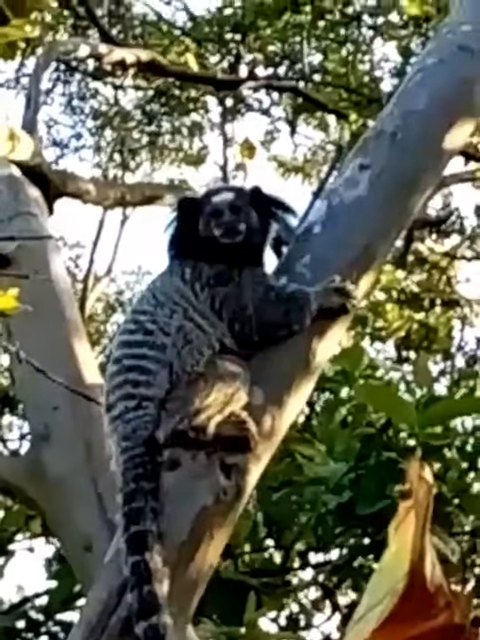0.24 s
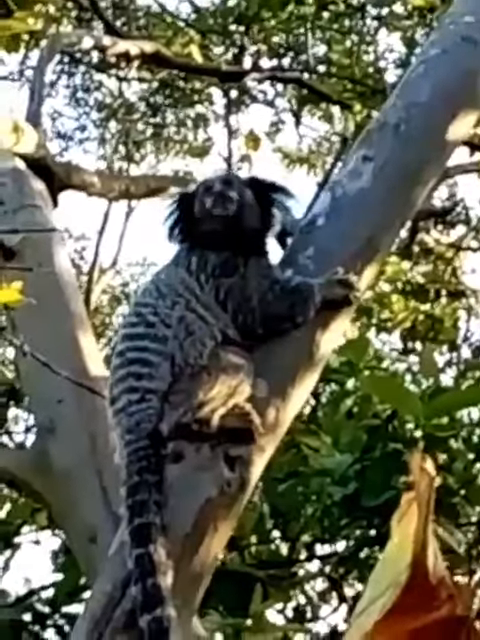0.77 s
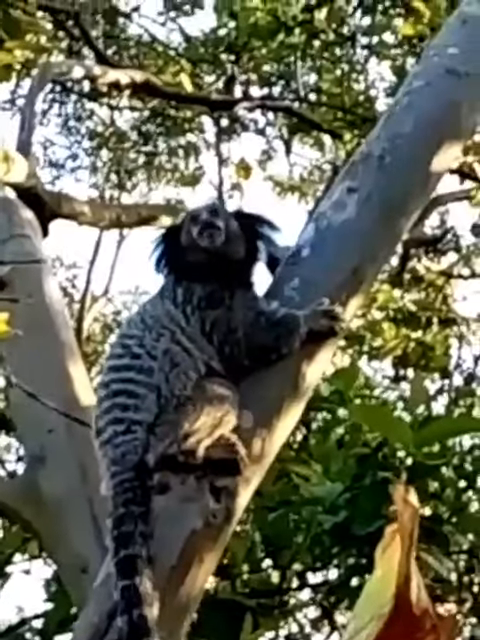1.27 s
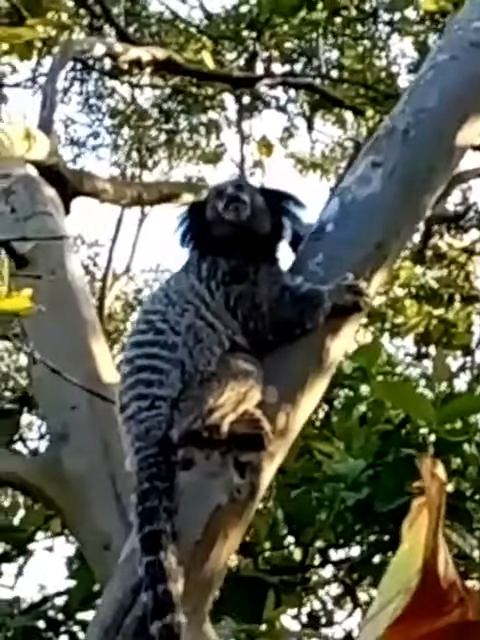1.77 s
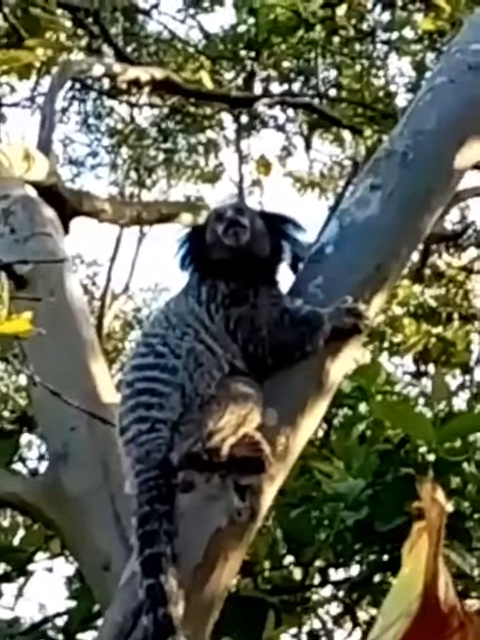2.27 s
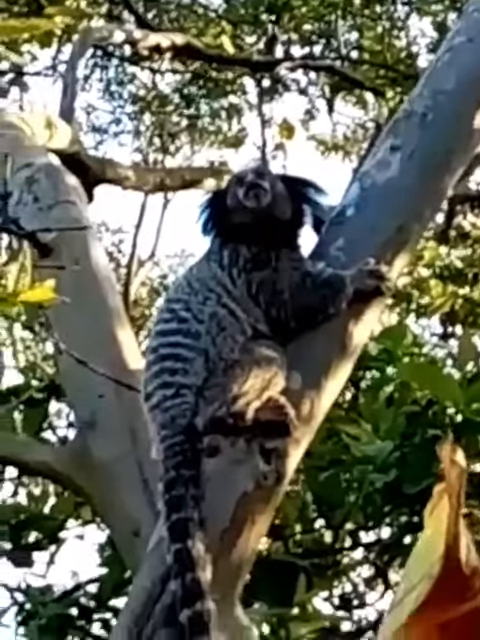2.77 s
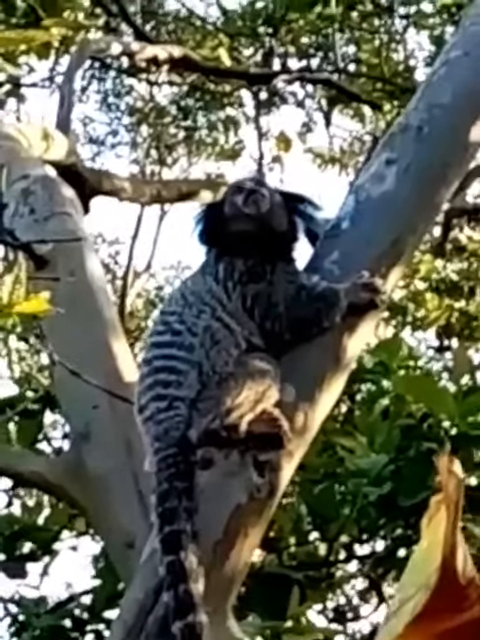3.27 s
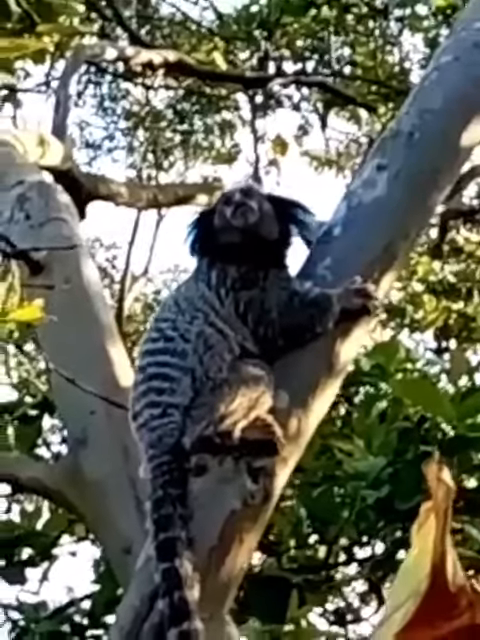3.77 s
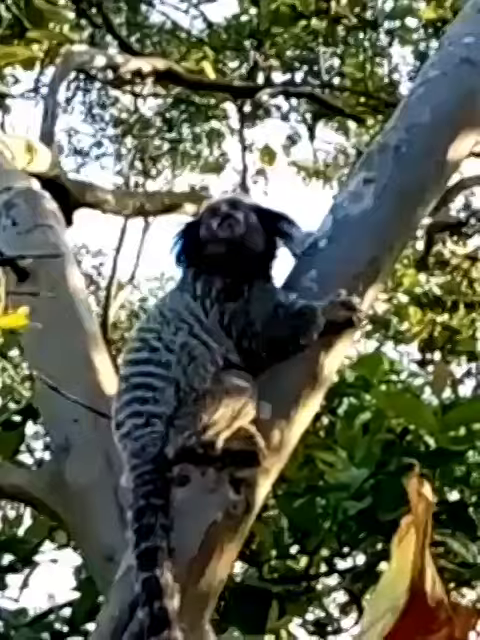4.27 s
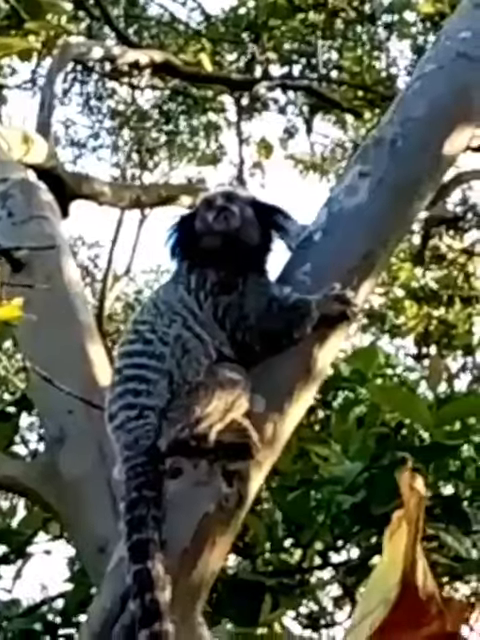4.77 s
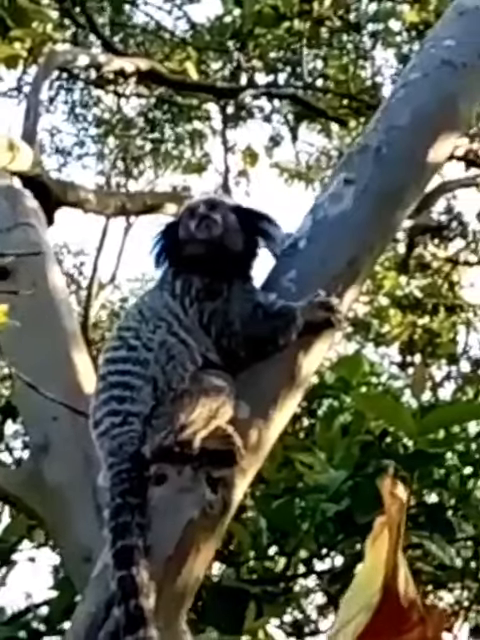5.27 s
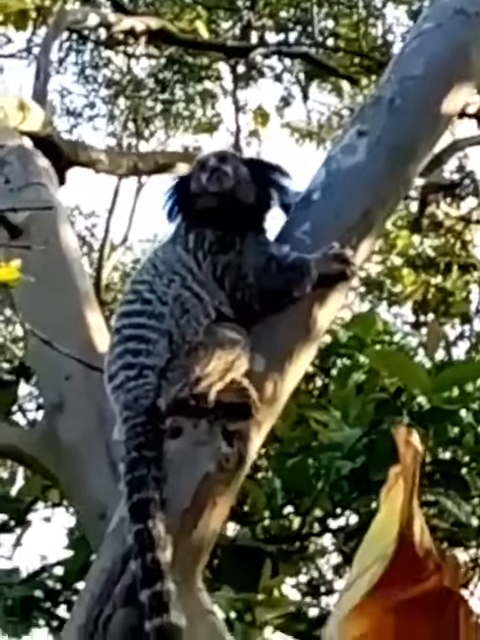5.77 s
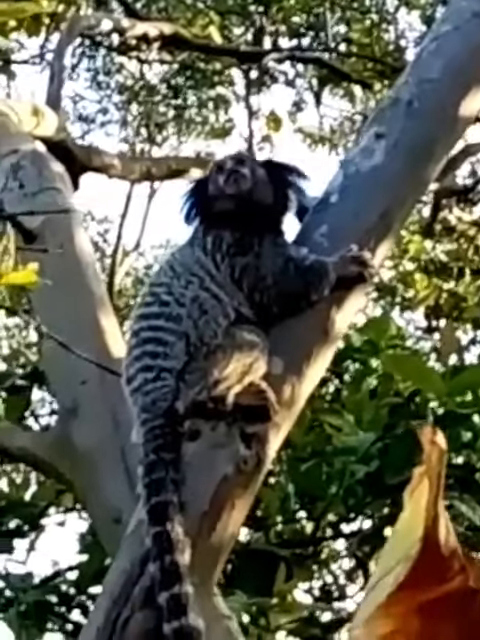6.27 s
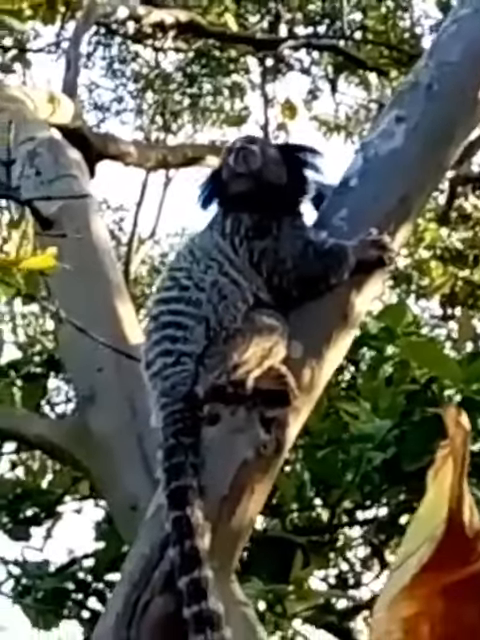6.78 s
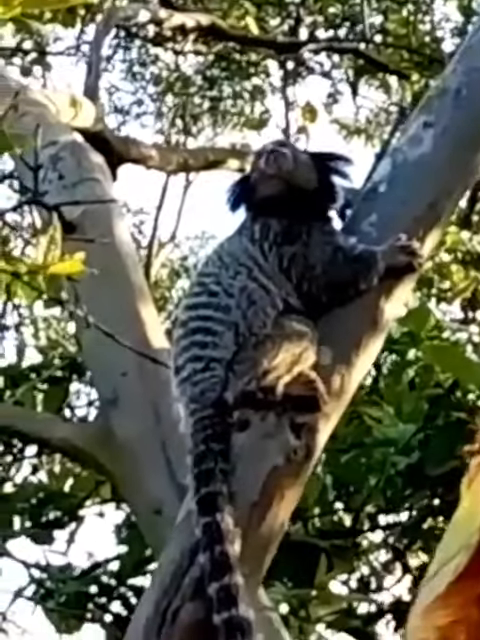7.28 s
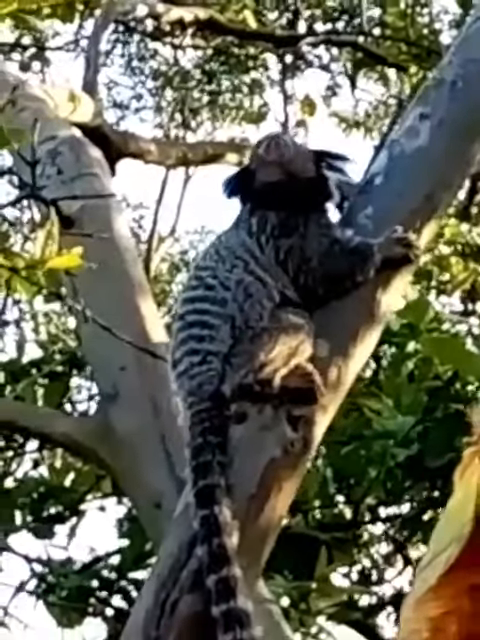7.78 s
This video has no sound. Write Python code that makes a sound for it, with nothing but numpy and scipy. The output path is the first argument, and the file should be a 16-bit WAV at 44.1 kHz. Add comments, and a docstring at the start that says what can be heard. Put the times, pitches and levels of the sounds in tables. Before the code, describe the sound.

Close to a phone microphone among trees, a marmoset gives a long, regular series of short, harsh chirps, each starting with a spit of air and sliding down. Early on, a second animal further off adds thin gliding whistles. Faint bird peeps, sparse dry ticks and late insect chips come between, over quiet low wind and traffic wash and leaf rustle with a slight woodland echo.

```python
"""Among trees, a marmoset scolds close to a phone with a series of harsh falling chirps: overtones of a gliding
pitch and breath noise, coloured by chest, mouth and teeth. A second one whistles further off in nearly pure tones.
Short distant notes are sliding sines: birds near 3 kHz, a whistle near 5.4 kHz, insect chips near 6.6 kHz and a
blip near 1.3 kHz. A few dry ticks sound, most with a twig ringing. A low wash of wind and traffic and a rustle of
leaves and insects, both shaped noise, lie underneath. Trunks and leaves echo: convolution with decaying noise."""
import sys
import numpy as np
from scipy import signal
from scipy.fft import rfft, irfft, next_fast_len
from scipy.io import wavfile
from scipy.ndimage import uniform_filter1d, minimum_filter1d, map_coordinates

SR = 44100
rng = np.random.default_rng(int(sys.argv[2]) if len(sys.argv) > 2 else 0)


def to_wav(s):
    """Save 16-bit WAV."""
    ch = np.atleast_2d(s).T  # columns
    pcm = np.round(np.clip(ch, -1, 1) * 32767)  # PCM
    wavfile.write(sys.argv[1], SR, pcm.astype(np.int16))


N = 354563

# Far rumble of wind and traffic over time: t/s, level/dB
RUMBLE_LEVEL = [(0, -48.5), (.22, -52), (.69, -44.5), (1.27, -55.5), (1.5, -46.5), (1.75, -53),
                (2.4, -45.5), (2.69, -56), (3.3, -56), (5.1, -56), (5.73, -52.5), (5.91, -58.5),
                (6.14, -48), (6.3, -54.5), (7, -57), (7.86, -62), (8.04, -51.5)]
# Spectrum of the rumble, relative density: f/Hz, level/dB
RUMBLE_COLOUR = [(25, -36), (50, -13.5), (80, -11), (125, -3), (190, -2.5), (300, -8.5), (420, -6),
                 (560, -9.5), (700, -14.5), (738, -8), (775, -21), (950, -28), (1300, -59)]
# Rustle of leaves and insects over time: t/s, level/dB (its mean course)
RUSTLE_LEVEL = [(0, -59), (.3, -62), (1.5, -64), (1.85, -59), (2.33, -69), (2.7, -58), (3.4, -54),
                (3.75, -63), (4.9, -58), (5.9, -64), (6.2, -56), (6.8, -65), (8.05, -62)]
# Spectrum of the rustle, relative density: f/Hz, level/dB
RUSTLE_COLOUR = [(700, -26.5), (1000, -12), (1700, -10), (2100, -11.5), (3000, -5), (4000, -12),
                 (4900, -11.5), (6400, -3), (7200, -27.5), (8000, -32), (13500, -35), (15000, -19),
                 (15700, -61.5)]
# Decay of the echo among trunks and leaves: f/Hz, t60/s
ECHO_DECAY = [(1000, 0.34), (4000, 0.36), (6500, 0.35), (9000, .2), (12000, 0.21), (15000, 0.31)]
# Frequency response of the echo: f/Hz, level/dB
ECHO_COLOUR_CURVE = [(1000, -2), (2500, -2), (7000, 0), (12000, -1), (15000, -10)]
# Short distant notes: birds near 3 kHz, a whistle near 5.4 kHz, insect chips near 6.6 kHz, a blip near 1.3 kHz:
# t/s, length/s, first f/Hz, last f/Hz, nominal peak level/dB
DISTANT_NOTES = [(0.324, 0.037, 3030, 3060, -56), (1.03, 0.052, 3090, 3030, -61),
                 (1.092, 0.13, 3540, 3420, -63), (1.204, 0.035, 3110, 3000, -53.5),
                 (1.525, 0.025, 3100, 3000, -54), (1.624, 0.037, 3400, 3280, -56),
                 (1.89, 0.088, 3320, 3230, -56), (1.957, 0.056, 3070, 2950, -57),
                 (2.419, 0.056, 3440, 3390, -60), (2.782, 0.053, 5410, 5500, -46),
                 (3.453, 0.041, 3310, 3210, -50.5), (3.725, 0.058, 3360, 3220, -47.5),
                 (3.733, 0.011, 1280, 1280, -46), (4.244, 0.05, 3125, 3160, -50.5),
                 (4.497, 0.1, 3130, 2950, -52.5), (5.27, 0.079, 3370, 3090, -54),
                 (5.826, 0.06, 3310, 3140, -53.5), (6.155, 0.036, 3330, 3260, -46),
                 (7.195, .015, 6560, 6360, -65), (7.256, 0.013, 6500, 6450, -44),
                 (7.321, 0.015, 6610, 6500, -45), (7.52, 0.015, 6600, 6400, -47),
                 (7.59, 0.02, 6750, 6270, -46.5), (7.664, 0.032, 6600, 6510, -47),
                 (7.762, 0.018, 6620, 6460, -43)]
# Dry ticks: t/s, peak level/dB, spectral tilt/(dB per octave), share of twig ring/(0-1)
DRY_TICKS = [(2.818, -40, 3, 1), (3.103, -39, 3, 0.83), (5.087, -45, 7, .9), (5.196, -12, -4, 0),
             (6.925, -38, 1, 1), (7.659, -40, -2, 0.8)]
# Modes of a ringing twig: f/Hz, relative level/dB, t60/s
TWIG_MODES = [(2490, -1, 0.018), (5500, 2, 0.011)]
# Whistles of the second animal, one glide each: t/s, pitch f/Hz, level/dB before a common trim
WHISTLE_GLIDES = [
    [(1.165, 5750, -40), (1.2, 5850, -30.5), (1.235, 5697, -23), (1.31, 5860, -40)],
    [(1.46, 5900, -58), (1.49, 6022, -19), (1.56, 6060, -22), (1.612, 6110, -36), (1.64, 6175, -21.5),
     (1.73, 6125, -39), (1.78, 5320, -36.5)],
    [(1.895, 5500, -28.5), (1.99, 5820, -22), (2.077, 5920, -20.5), (2.165, 5990, -23.5), (2.32, 6090, -18),
     (2.365, 6130, -29.5), (2.4, 6260, -19.5), (2.475, 6410, -14.5), (2.52, 6660, -53)],
]
# Scolding chirps, each a pair of settings and glide.
# Settings: hiss level/dB, swell of the hiss/dB, swell peak/(share of length), mouth level/dB, chest level/dB,
# chest change by the end/dB, spit of air at the start/dB, its decay constant/s, fade/(share of length),
# mouth peak/(share of length), period doubling/(0-1). Glide: t/s, pitch f/Hz, roughness/(0-1)
SCOLDING = [ ((-27, 1.5, .5, -21.5, -32.5, -9.5, 8, .015, .25, .45, .1), [(-.07, 2400, .2), (0, 2278, .2),
            (.052, 1692, .3), (.072, 1150, .32), (.09, 1073, .35)]),
            ((-25.5, 3.5, 0.2, -23.5, -38.5, 6, 7, .025, .15, .5, .15), [(.401, 1739, .5), (.487, 1980, .4),
            (.495, 2555, .2), (.553, 1198, .27), (.565, 1054, .28), (.579, 1100, .3)]),
            ((-24.5, 1, 1, -24.5, -36, 5, 9, .025, .15, .3, .1), [(.851, 1746, .2), (.875, 1936, .2),
            (.896, 2410, .23), (.961, 1688, .27), (.988, 1050, .3), (1.005, 903, .3)]),
            ((-24, 1, 0.3, -24, -32.5, 1.5, 10, .01, .12, .2, .1), [(1.262, 2294, .15), (1.281, 2652, .17),
            (1.3, 2255, .2), (1.371, 1430, .29), (1.388, 1139, .31), (1.416, 1085, .35)]),
            ((-24, 4.5, 0.7, -23, -34.5, 1, 8, .035, .18, .35, .1), [(1.68, 1999, .5), (1.7, 2537, .4),
            (1.722, 2656, .3), (1.752, 1988, .31), (1.784, 1720, .32), (1.825, 1147, .34),
            (1.844, 950, .35)]), ((-26, 3, 0.7, -23.5, -34.5, 1.5, 9, .012, .18, .3, .1),
            [(2.098, 2469, .4), (2.128, 2692, .38), (2.14, 2280, .37), (2.181, 1941, .35),
            (2.221, 978, .32), (2.245, 965, .3)]),
            ((-24, 4.5, .75, -19.5, -33, -4.5, 9, .018, .12, .35, .1), [(2.487, 2162, .15),
            (2.505, 2853, .17), (2.536, 2288, .23), (2.59, 1969, .32), (2.604, 1695, .34),
            (2.615, 1153, .36), (2.64, 1137, .4)]), ((-25.5, -0.5, 0, -25, -35, 5, 14, .009, .08, .3, .1),
            [(2.837, 2492, .25), (2.853, 2710, .25), (2.888, 2127, .27), (2.928, 1194, .29),
            (2.954, 946, .3)]), ((-23.5, 1.5, -0.5, -23, -34.5, -5.5, 9, .02, .1, .4, .5),
            [(3.165, 2330, .1), (3.176, 3050, .12), (3.191, 2800, .15), (3.2, 2550, .72), (3.22, 2150, .65),
            (3.24, 1800, .58), (3.262, 1358, .48), (3.299, 1297, .7)]),
            ((-23, 5.5, 0.9, -26, -36, -13.5, 8, .022, .14, .35, .5), [(3.519, 2117, .15),
            (3.545, 2667, .2), (3.565, 2230, .6), (3.628, 2300, .75), (3.636, 1250, .55), (3.65, 1100, .45),
            (3.678, 1043, .6)]), ((-24, 9, 0.9, -23, -37, -12.5, 9, .025, .16, .35, .2),
            [(3.912, 2333, .15), (3.933, 2922, .16), (3.962, 2242, .17), (4.015, 2480, .2),
            (4.022, 1250, .5), (4.045, 1150, .55), (4.061, 1100, .85)]),
            ((-23, 6.5, 0.8, -23, -38.5, -4, 10, .012, .28, .4, .5), [(4.291, 2541, .3), (4.314, 3000, .58),
            (4.366, 1603, .43), (4.385, 1456, .2), (4.407, 1283, .23), (4.469, 1300, .3)]),
            ((-25, 4.5, -0.9, -24, -40.5, 12.5, 11, .03, .16, .55, .3), [(4.722, 2940, .85),
            (4.762, 2753, .7), (4.794, 1657, .3), (4.81, 1426, .2), (4.849, 1592, .2), (4.875, 1412, .2),
            (4.91, 633, .2)]), ((-25.5, 4.5, 0.5, -23.5, -31, -2, 10, .014, .1, .2, .1),
            [(5.114, 1700, .12), (5.146, 1862, .14), (5.165, 1629, .16), (5.231, 1263, .2),
            (5.241, 1265, .27), (5.249, 631, .6), (5.266, 596, .75)]),
            ((-28, 6, .35, -24.5, -30.5, -10, 8, .008, .14, .25, .4), [(5.513, 3600, .2), (5.52, 2700, .25),
            (5.531, 2152, .5), (5.546, 2291, .68), (5.553, 1365, .6), (5.58, 1280, .35), (5.601, 1195, .43),
            (5.629, 854, .55)]), ((-24, 9.5, 0.7, -24.5, -39, -11.5, 5, .018, .14, .5, .9),
            [(5.908, 2620, .83), (5.935, 2600, .7), (5.95, 2300, .35), (5.968, 2250, .35), (5.99, 1900, .4),
            (6.017, 1333, .53), (6.045, 1182, .6)]), ((-24, 2, .4, -21, -32, -6.5, 5, .025, .22, .4, .15),
            [(6.278, 1810, .8), (6.297, 2050, .65), (6.31, 2070, .2), (6.339, 2026, .22),
            (6.357, 1820, .25), (6.39, 1656, .27), (6.41, 1526, .29), (6.436, 1184, .5),
            (6.459, 1065, .8)]), ((-26, 5, 0.1, -27, -27, -9.5, 8, .008, .16, .12, .1), [(6.624, 1695, .12),
            (6.634, 1858, .12), (6.668, 1508, .13), (6.718, 1424, .15), (6.738, 1085, .2), (6.75, 685, .4),
            (6.772, 629, .6)]), ((-24.5, 5, 1.5, -22.5, -30, -4, 8, .012, .25, .35, .15),
            [(6.998, 1738, .92), (7.03, 1850, .88), (7.048, 1860, .15), (7.078, 1548, .17),
            (7.118, 1407, .23), (7.146, 1113, .28), (7.16, 1056, .3)]),
            ((-29, 3.5, -0.7, -26.5, -32.5, -5.5, 8, .009, .2, .25, .15), [(7.385, 1840, .9),
            (7.405, 2046, .8), (7.43, 1595, .2), (7.447, 1289, .24), (7.468, 1230, .3), (7.493, 675, .36),
            (7.503, 661, .38)]), ((-22.5, 3.5, -0.5, -22.5, -42, -6, 9, .03, .22, .4, .4),
            [(7.818, 2508, .85), (7.851, 3022, .5), (7.9, 2100, .5), (7.931, 1690, .55), (7.966, 1323, .77),
            (7.976, 1340, .83)]), ]
# Spectra of the three regions of the voice, relative density: f/Hz, level/dB
CHEST_COLOUR = [(350, -51.5), (550, 19.5), (750, 5), (1100, 4), (1600, 1), (2400, 5.5), (3300, -2),
                (4400, -2), (5200, -52)]
MOUTH_COLOUR = [(3800, -24), (4600, -18), (5900, -0.5), (6350, -8), (6750, 1), (7400, -3.5), (8000, -12.5),
                (9000, -23.5), (10000, -25)]
TEETH_COLOUR = [(8000, -54.5), (9200, -27.5), (11600, -18), (12100, -30), (12600, -16), (13600, -13),
                (14800, 5.5), (15600, -10.5), (15900, -39.5), (16600, -49)]

TOP_HZ = 16700  # band limit of the phone
LEAVES_STIR_DB = 2  # scale of the random stirring
SWELL_WIDTH = .16  # share of length
POP_DB, POP_S = 4, .003  # click of the parting lips, decay constant
MOUTH_SHUT_DB, MOUTH_SAG_DB = -6, -11  # level at the start, change after the peak
CHEST_OPENS, CHEST_SHUT_DB = 0.38, -22.5  # the chest joins in late: share of length, level at the start
FADE_DB = -16  # change over the fade


def amp(db):
    """Level definition: amplitude ratio from decibels."""
    return 10 ** (np.asarray(db) / 20)


def unit(x):
    """Normalisation to an rms value of 1."""
    return x / np.sqrt(np.mean(x ** 2) + 1e-20)


def along(points, hz):
    """Interpolation of (f/Hz, value) points on a logarithmic frequency axis."""
    f, v = np.transpose(points)
    return np.interp(np.log(hz + 1), np.log(f + 1), v)


def curves(rows):
    """Linear interpolation in time: the samples a table spans, then a curve for each column."""
    s, *cols = np.transpose(rows)
    n = np.arange(max(round(s[0] * SR), 0), min(round(s[-1] * SR), N))
    return n, [np.interp(n / SR, s, c) for c in cols]


def wobble(rate, size=N):
    """Band-limited random modulation: a smooth curve through rate random knots a second."""
    knots = rng.standard_normal(int(size * rate / SR) + 4)
    return map_coordinates(knots, [np.arange(size) * rate / SR])


def filtered(x, response):
    """Linear filtering: the spectrum of x times a response of frequency."""
    m = next_fast_len(x.shape[-1] + 8192)
    spectrum = rfft(x, m) * response(np.fft.rfftfreq(m, 1 / SR))
    return irfft(spectrum, m)[..., :x.shape[-1]]


def coloured(x, spectrum):
    """Spectral shaping that keeps the power of a flat input."""
    points = [(1, -120)] + spectrum + [(SR / 2, -120)]
    return filtered(x, lambda hz: unit(amp(along(points, hz))))


def fade(count, attack, release):
    """Linear envelope: soft edges of the given durations in seconds."""
    t = np.arange(count) / SR
    return np.clip(np.minimum(t / attack, t[::-1] / release), 0, 1)


def rush(spectrum, patchy_db):
    """Random noise of rms 1 whose gain varies in patches of time and frequency."""
    z = signal.stft(rng.standard_normal(N), nperseg=512)[2]
    field = rng.standard_normal(z.shape)
    field = uniform_filter1d(uniform_filter1d(field, 4, 0), 10, 1)
    patchy = signal.istft(z * amp(patchy_db * unit(field)), nperseg=512)[1][:N]
    return unit(coloured(patchy, spectrum))


def wash():
    """Broadband ambient noise: a far rumble, and the rustle of leaves and insects."""
    t = np.arange(N) / SR
    rumble_db = np.interp(t, *np.transpose(RUMBLE_LEVEL))
    rumble = amp(rumble_db) * rush(RUMBLE_COLOUR, patchy_db=2.6)
    rustle_db = np.interp(t, *np.transpose(RUSTLE_LEVEL)) + LEAVES_STIR_DB * wobble(4.5)
    return rumble + amp(rustle_db) * rush(RUSTLE_COLOUR, patchy_db=2.8)


def echo(x, decays):
    """Diffuse reverberation: each frequency dies at its own speed; the leaves swallow some of the top."""
    hz, t, z = signal.stft(rng.standard_normal(SR // 2), SR, nperseg=256)
    decay = amp(-60 * t / along(decays, hz)[:, None])
    tail = signal.istft(z * decay, SR, nperseg=256)[1]
    wet = signal.fftconvolve(x, tail / np.linalg.norm(tail))[:N]
    return filtered(wet, lambda f: amp(along(ECHO_COLOUR_CURVE, f)))


def distant_notes():
    """Frequency glides: short sines that flutter a little in level on the way through the leaves."""
    out = np.zeros(N)
    for s, length, first_hz, last_hz, db in DISTANT_NOTES:
        count = round(length * SR)
        phase = 2 * np.pi * np.cumsum(np.linspace(first_hz, last_hz, count)) / SR
        flutter_db = 2.0 * wobble(90, size=count)
        shape = fade(count, length * 0.1, length * 0.28) * amp(db + flutter_db)
        out[round(s * SR):][:count] += shape * np.sin(phase)
    return out


def ticks():
    """Impulse excitation: single clicks, most of which set the damped modes of a twig ringing."""
    out, t = np.zeros(N), np.arange(512) / SR
    twig = sum(amp(level_db - 60 * t / t60) * np.sin(2 * np.pi * hz * t) for hz, level_db, t60 in TWIG_MODES)
    for s, db, tilt_db, ring in DRY_TICKS:
        snap = (1 + .5 * rng.standard_normal(len(t))) * amp(-60 * t / .0004)  # t60 0.4 ms
        click = np.pad((1 - ring) * snap + ring * twig / 2, (256, 0))

        def tilted_band(hz):
            """Spectral tilt between a lower edge of 250 Hz and an upper one near 6200 Hz."""
            return amp(tilt_db * np.log2(hz / 1500 + .1)) * (hz > 250) / (1 + (hz / 6200) ** 16)

        click = filtered(click, tilted_band)
        out[round(s * SR) - 256:][:len(click)] += amp(db) * click / np.abs(click).max()
    return out


def whistles():
    """Near-sinusoidal oscillation: a gliding tone with a faint octave."""
    out = np.zeros(N)
    for rows in WHISTLE_GLIDES:
        n, (hz, db) = curves(rows)
        drift = 0.0009 * wobble(60, size=len(n))
        phase = 2 * np.pi * np.cumsum(hz * (1 + drift)) / SR
        tone = np.sin(phase) + amp(-48.5) * np.sin(2 * phase)
        level = amp(db - 1.5 + 1.2 * wobble(33, size=len(n)))
        out[n] += level * tone * fade(len(n), .005, .01)
    return out


def region_levels(t, length, hiss_db, swell_db, swell_at, mouth_db, chest_db, sag_db, spit_db, spit_s, fades,
                  mouth_at):
    """Articulation in dB: air spits through the teeth first, mouth and chest open after, all die together."""
    u = t / length

    def opened(at, shut_db, change_db):
        """Piecewise-linear level: it moves from shut_db to 0 at its opening, then to change_db."""
        return np.where(u < at, shut_db * (1 - u / at), change_db * (u - at) / (1 - at))

    pop_db = POP_DB * np.exp(-t / POP_S)
    edge_db = pop_db + FADE_DB * np.clip(1 - (1 - u) / fades, 0, 1)
    swell = swell_db * np.exp(-((u - swell_at) / SWELL_WIDTH) ** 2)
    teeth_db = hiss_db + spit_db * np.exp(-t / spit_s) + swell
    return [chest_db + opened(CHEST_OPENS, CHEST_SHUT_DB, sag_db) + edge_db,
            mouth_db + opened(mouth_at, MOUTH_SHUT_DB, MOUTH_SAG_DB) + edge_db,
            teeth_db + edge_db]


def chirps():
    """Source-filter voice: roughness shakes a gliding harmonic tone and lets breath through, most in the treble."""
    out, k = np.zeros(N), np.arange(1, 30)[:, None]
    strength = amp(6.0 * (k == 1))  # the fundamental stands out
    for (*levels, doubling), glide in SCOLDING:
        n, (hz, rough) = curves(glide)
        size, start_s = len(n), glide[0][0]
        chest_db, mouth_db, teeth_db = region_levels(n / SR - start_s, glide[-1][0] - start_s, *levels)
        drift = (.005 + .03 * rough) * wobble(110, size=size)
        jitter = (.005 + .1 * rough ** 2) * wobble(900, size=size)
        phase = 2 * np.pi * np.cumsum(hz * (1 + drift + jitter)) / SR

        # each overtone wavers alone
        flutter = amp((1.5 + 4 * rough) * np.array([wobble(70, size=size) for _ in k]))
        start_phase = rng.uniform(0, 2 * np.pi, k.shape)
        overtones = strength * flutter * np.cos(k * phase + start_phase) * (k * hz < SR / 2.5)
        # overtones as dense in power as white noise of rms 1
        tone = np.sum(overtones, 0) * np.sqrt(4 * hz / SR)
        tone *= amp((.5 + 3 * rough) * wobble(350, size=size))

        # strong and weak cycles alternate: spectral lines halfway between the overtones
        halves = 2 * doubling * rough * np.cos(phase / 2)
        breath = rng.standard_normal(size) * (1 + 0.22 * np.cos(phase))  # pulses with the pitch
        breath = filtered(breath, lambda f: 1 / (1 + (850 / (f + 1)) ** 6))

        # a smaller power lets more breath through; split scales the period doubling
        regions = [(CHEST_COLOUR, chest_db, 1.8, .2), (MOUTH_COLOUR, mouth_db, 1.4, 1),
                   (TEETH_COLOUR, teeth_db, .5, 1)]
        for colour, db, power, split in regions:
            share = rough ** power
            mixture = np.sqrt(1 - share) * tone * (1 + split * halves) + np.sqrt(share) * breath
            level = amp(db + 0.79 * wobble(122, size=size))
            out[n] += coloured(mixture, colour) * level * fade(size, .0015, .008)
    return out


def scene():
    """Superposition: direct sounds and echoes add at one microphone that feeds both channels."""
    near, far = chirps(), whistles() + distant_notes()
    far = far + amp(-12) * echo(far, ECHO_DECAY)
    near = near + amp(-18.5) * echo(near, ECHO_DECAY)
    mid = near + far + ticks() + wash()
    return np.array([mid, mid])


def record(dry, depth_db=9, knee_db=-38, hold=.02, release=0.049):
    """Dynamic compression: the phone turns its bass down in loud sound and keeps nothing above its band limit."""
    power = uniform_filter1d(np.mean(dry ** 2, 0), 400)
    level_db = 10 * np.log10(np.abs(power) + 1e-10)
    need_db = -depth_db * np.clip((level_db - knee_db) / 8, 0, 1)  # full depth 8 dB above the knee
    width = round(hold * SR)  # hold and release are in seconds
    gain_db = minimum_filter1d(need_db, width, origin=width // 2 - 1)
    step = 1 / (release * SR)
    slow_db = signal.lfilter([step], [1, step - 1], gain_db)  # the gain comes back gradually
    gain_db = uniform_filter1d(np.minimum(gain_db, slow_db), 400)
    # band from about 70 to 850 Hz
    bass = filtered(dry, lambda hz: 1 / (1 + (hz / 850) ** 8) / (1 + (70 / (hz + 1)) ** 6))
    return filtered(dry + bass * (amp(gain_db) - 1), lambda hz: hz < TOP_HZ)


dry = scene()
out = record(dry)
to_wav(out)
```